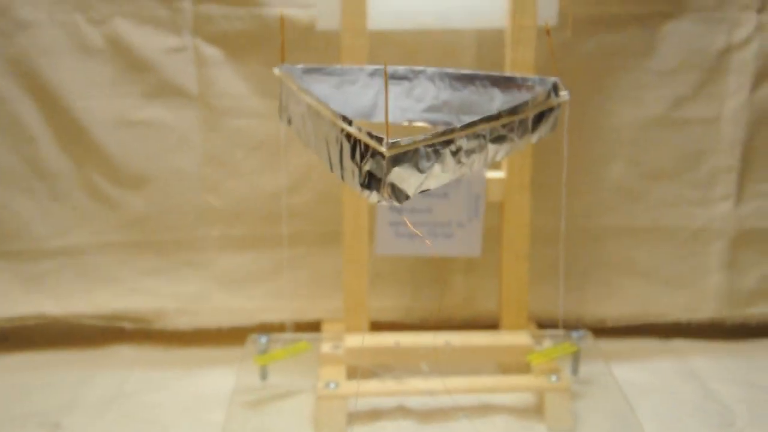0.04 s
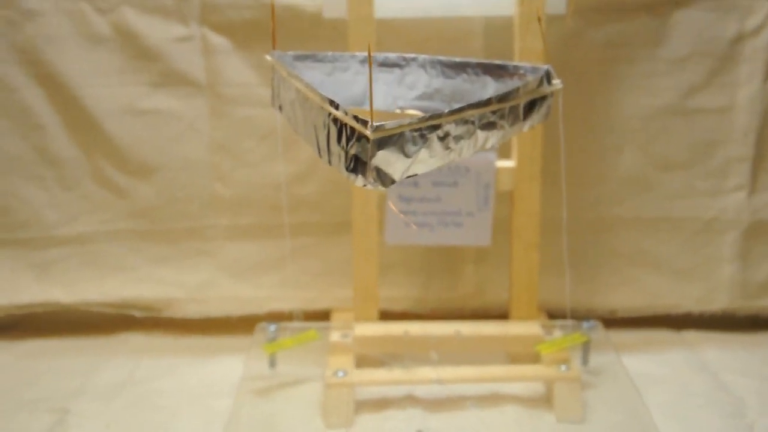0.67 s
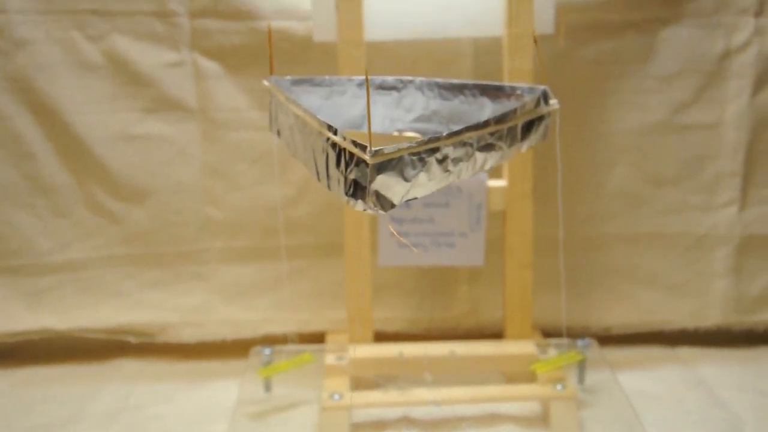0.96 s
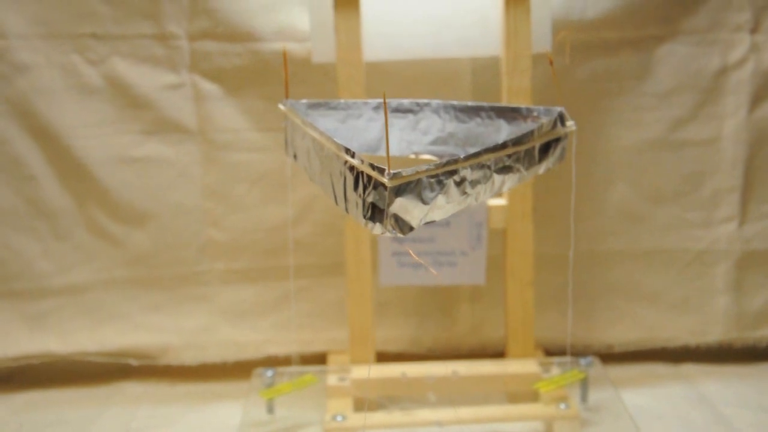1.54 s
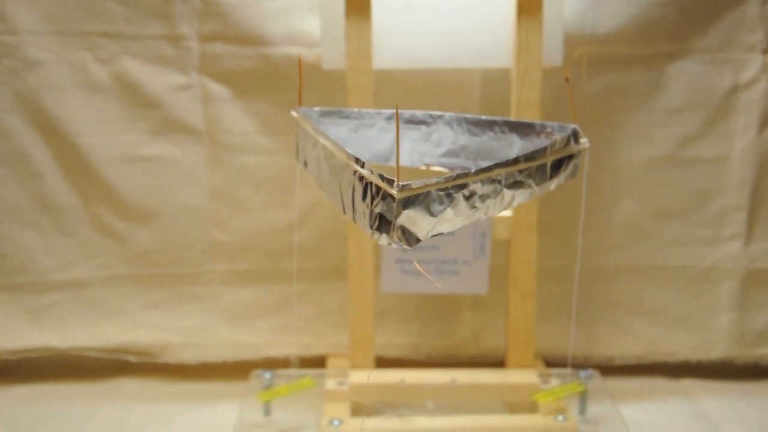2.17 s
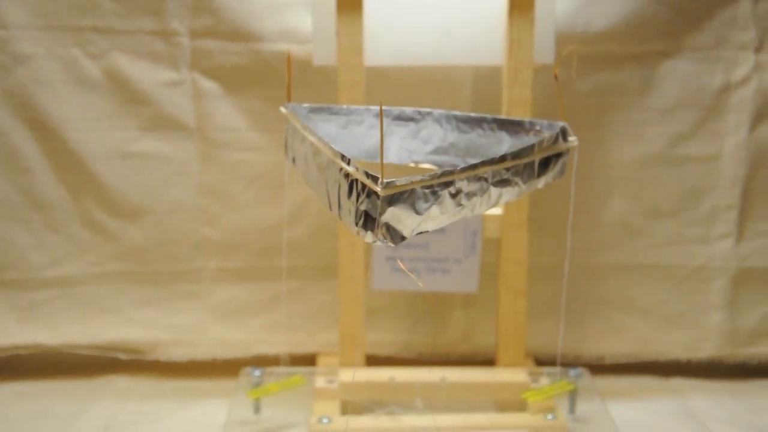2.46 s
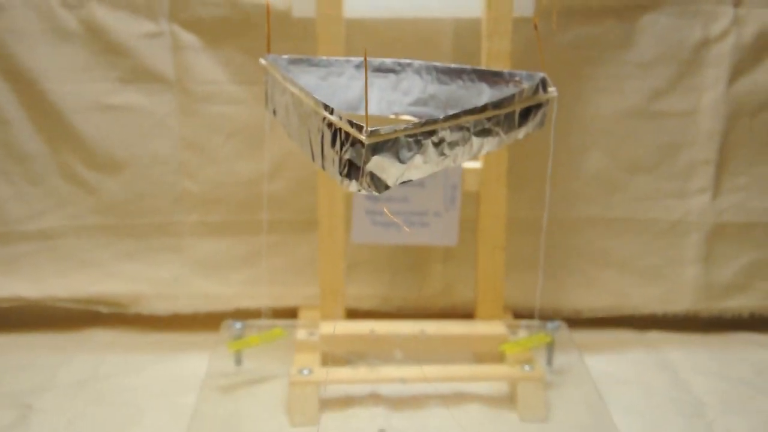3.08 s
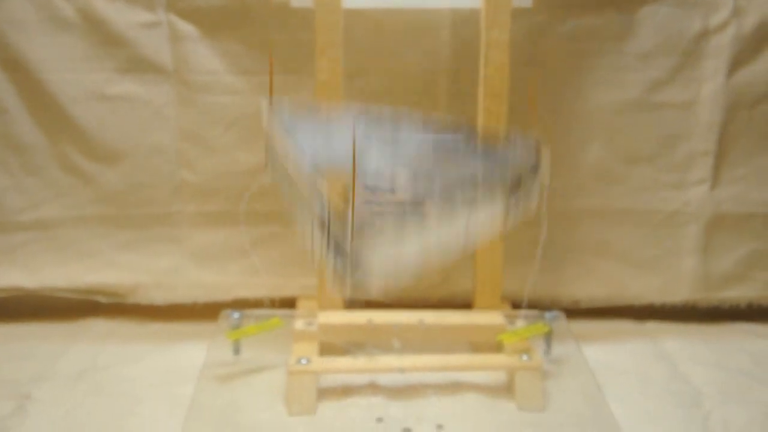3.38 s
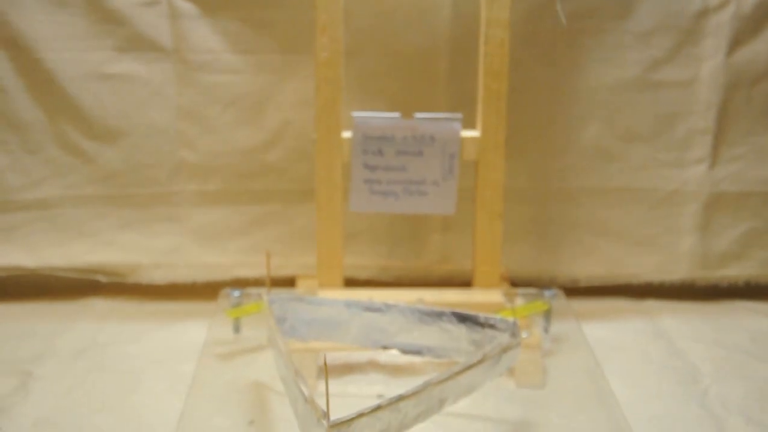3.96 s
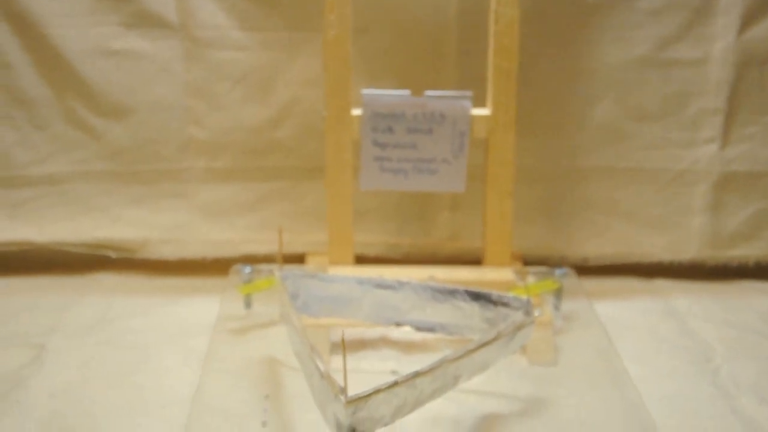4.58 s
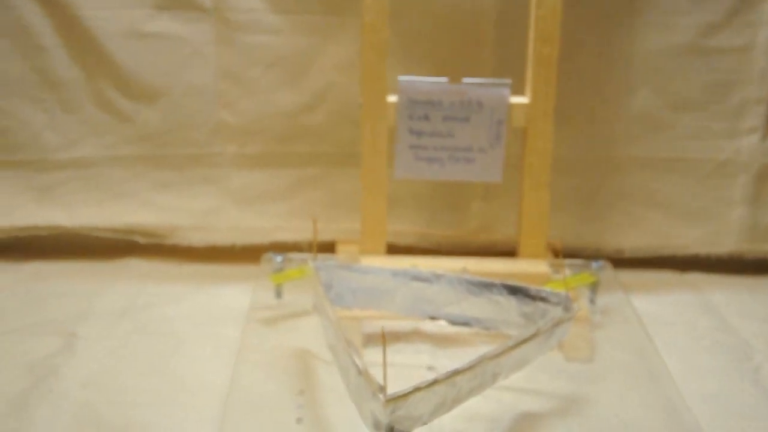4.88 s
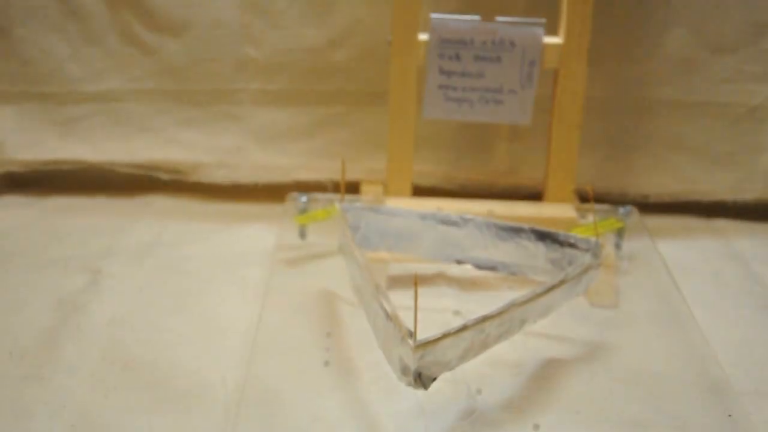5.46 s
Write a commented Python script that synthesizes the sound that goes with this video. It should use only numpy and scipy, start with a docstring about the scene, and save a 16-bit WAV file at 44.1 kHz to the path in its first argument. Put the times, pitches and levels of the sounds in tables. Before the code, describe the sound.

Steady electrical hissing stops suddenly, followed by sharp knocks and faint foil ticks as a light frame drops on a tabletop.

```python
"""In a small room, a foil and balsa ion lifter hovers over a table. Countless tiny corona discharges
on its wire, each a pressure pulse, merge into a hiss over a soft rush of air. The voltage is cut, the
charge drains and the hiss stops. The craft drops, bounces once and settles with faint ticks of foil;
its impacts excite the modes of frame and table. Room noise and a low wavering drone continue throughout,
with a dull knock at the start and a small click and a rustle near the end."""
import sys
import numpy as np
from scipy import signal
from scipy.fft import rfft, irfft, next_fast_len
from scipy.io import wavfile
from scipy.ndimage import uniform_filter1d, minimum_filter1d

SR = 44100
rng = np.random.default_rng(int(sys.argv[2]) if len(sys.argv) > 2 else 0)


def inscribe(sig):
    """Save sig as 16-bit PCM at rate SR to the path in sys.argv[1].

    A 1-D sig is mono; a 2-D sig holds one channel per row.
    Samples are clipped to [-1, 1] before scaling.
    """
    pcm = np.round(np.clip(np.atleast_2d(sig).T, -1, 1) * 32767)
    wavfile.write(sys.argv[1], SR, pcm.astype(np.int16))


N = 252693
T = np.arange(N) / SR
CUT_S = 3.348  # the voltage is switched off


def undb(db):
    """Amplitude ratio of a level in decibels."""
    return 10 ** (np.asarray(db) / 20)


def unit_rms(x):
    """Normalisation to rms 1."""
    return x / np.sqrt(np.mean(x ** 2))


def unit_energy(x):
    """Normalisation to energy 1."""
    return x / np.sqrt(np.sum(x ** 2))


def place(start_s, sound):
    """Pure delay: the sound begins at start_s."""
    return np.pad(sound, (int(start_s * SR), N))[:N]


def convolve(x, response):
    """Convolution with an impulse response, cut to the input's length."""
    return signal.fftconvolve(x, response)[:len(x)]


def butterworth(x, hz, kind, order=2):
    """Causal filter with a maximally flat passband."""
    return signal.sosfilt(signal.butter(order, hz, kind, fs=SR, output="sos"), x)


def colour(x, spectrum, tilt_db=0, size=4096):
    """Minimum-phase filter through (f/Hz, level/dB) points, tilted by tilt_db per octave about 3 kHz."""
    hz, db = np.transpose(spectrum)
    f = np.maximum(np.arange(size // 2 + 1) * SR / size, 10)
    octave = np.log2(f / 3000)
    gain = undb(np.interp(octave, np.log2(hz / 3000), db) + tilt_db * np.maximum(octave, -2))
    cepstrum = irfft(np.log(gain))
    cepstrum[1:size // 2] *= 2  # folding onto positive time makes the response causal
    cepstrum[size // 2 + 1:] = 0
    return convolve(x, irfft(np.exp(rfft(cepstrum))))


def resonant_noise(peaks):
    """Random excitation of resonances (f/Hz, width/Hz, level/dB), at rms 1."""
    size = next_fast_len(N, True)
    f = np.arange(1, size // 2 + 2) * SR / size
    power = sum(undb(db) ** 2 / (1 + ((f / hz - hz / f) * hz / (2 * width)) ** 2) ** 2
                for hz, width, db in peaks)
    white = rfft(rng.standard_normal(size))
    return unit_rms(irfft(white * np.sqrt(power), size)[:N])


def wander(rate_hz):
    """Random modulation: smoothed steps at rms 1."""
    span = int(SR / rate_hz)
    steps = np.repeat(rng.standard_normal(N // span + 1), span)
    return unit_rms(uniform_filter1d(uniform_filter1d(steps, span), span)[:N])


def decay(t60):
    """Half a second of exponential damping, 60 dB in t60 seconds."""
    return np.exp(-np.log(1000) * T[:SR // 2] / t60)


def ring(modes, detune=0.0042):
    """Free vibration: damped modes of alternating sign, slightly detuned at each strike."""
    pull = 1 + detune * rng.standard_normal(len(modes))
    partials = ((-1) ** k * undb(db) * decay(t60) * np.cos(2 * np.pi * hz * pull[k] * T[:SR // 2])
                for k, (hz, db, t60) in enumerate(modes))
    return unit_energy(sum(partials))


def burst(t60):
    """Exponentially damped noise of energy 1."""
    return unit_energy(decay(t60) * rng.standard_normal(SR // 2))


def room(x, wet_db, gap_s=.008, t60=0.53):
    """Reverberation: diffuse wall reflections follow the direct sound."""
    return x + undb(wet_db) * convolve(x, place(gap_s, burst(t60))[:SR])


def after_cut(db_per_s):
    """Relaxation: a gain of 1 that decays exponentially once the voltage is cut."""
    return undb(-db_per_s * np.maximum(T - CUT_S, 0))


# spectrum of one discharge: f/Hz, level/dB
DISCHARGE_SPECTRUM = [(120, -24.5), (280, -12.5), (750, -4), (1000, -6.5), (1300, -2), (1750, -3.5),
                      (2050, -8), (2650, -0.5), (3600, -1.5), (4300, 2.5), (5000, 1), (5500, -3.5),
                      (6050, -9), (6500, -15)]
# modes of the foil skirt: f/Hz, level/dB, T60/s
SKIRT_MODES = [(620, -3.5, 0.02), (825, 0, 0.0096), (1307, 0, .05), (2630, 0, 0.035), (4120, -4.5, 0.09),
               (4290, 1.5, 0.03), (4511, -4, 0.071), (4950, -2.5, 0.013)]


def corona(per_s=4000, spread_db=2.0, skirt_db=-11, db=-38.5, rise_db_per_s=0.46):
    """Shot noise: random discharges of uneven size add up to a hiss until the charge drains."""
    fires = rng.random(N) < per_s / SR
    pulses = fires * undb(spread_db * np.minimum(rng.exponential(size=N), 4))
    discharges = colour(pulses - pulses.mean(), DISCHARGE_SPECTRUM)
    # forced vibration: the ion wind streams over the foil and keeps it ringing
    foil = convolve(rng.standard_normal(N), ring(SKIRT_MODES, detune=.001))
    hiss = unit_rms(discharges) + undb(skirt_db) * unit_rms(foil)
    envelope = undb(db + rise_db_per_s * T) * after_cut(db_per_s=421)
    return room(hiss * envelope, wet_db=-13)


# resonances of the rushing air: f/Hz, width/Hz, level/dB
AIR_RESONANCES = [(228, 29, -1.5), (305, 90, -4.5), (516, 81, -5), (678, 110, 1), (869, 81, 3),
                  (1117, 63, 1), (1298, 99, 0.5), (1680, 790, -11)]


def air_rush(db=-46, gust_db=0.72):
    """Turbulence: moving air makes a soft rush that runs down slowly after the cut."""
    return resonant_noise(AIR_RESONANCES) * undb(db + gust_db * wander(27.26)) * after_cut(db_per_s=14)


def supply_hum(hz=329.6, db=-64, waver_db=2.5):
    """Amplitude modulation: the power supply's faint tone wavers, then fades after the cut."""
    envelope = undb(db + waver_db * wander(5.2)) * after_cut(db_per_s=40)
    return np.sqrt(2) * envelope * np.sin(2 * np.pi * hz * T)


# spectral density of the room noise: f/Hz, level/dB
ROOM_SPECTRUM = [(25, -8), (38, -13.5), (52, -0.5), (72, -3.5), (130, -1), (190, -6), (400, -2),
                 (850, -15.5), (1900, -12.5), (3200, -18), (5000, -22), (6400, -32)]
# its resonances: f/Hz, width/Hz, level/dB
ROOM_RESONANCES = [(568, 67, 2.5), (700, 44, -1), (1127, 93, -2), (1294, 80, -2.5), (2120, 60, 0),
                   (2605, 55, -4.5), (3664, 130, -10.5), (4060, 80, -14.5), (4480, 100, -11),
                   (4810, 60, -14), (5140, 60, -14), (5370, 70, -16), (5650, 110, -19)]


def room_noise(broad_db=-57, peaks_db=-58, flutter_db=0.6):
    """Superposition of broadband noise and hollow resonances, fluttering slightly in level."""
    broad = undb(broad_db) * unit_rms(colour(rng.standard_normal(N), ROOM_SPECTRUM))
    hollow = undb(peaks_db) * resonant_noise(ROOM_RESONANCES)
    return (broad + hollow) * undb(flutter_db * wander(16))


def wavering_tone(hz, db, pitch_spread, spread_db):
    """Random frequency and amplitude modulation of a sinusoid."""
    phase = 2 * np.pi * np.cumsum(hz * (1 + pitch_spread * wander(16))) / SR
    return np.sqrt(2) * undb(db + spread_db * wander(27)) * np.sin(phase)


# pitch contour of the low drone: t/s, f/Hz
DRONE_PITCH = [(0.0, 55.9), (1.66, 70.4), (2.46, 63.2), (2.66, 67.6), (4.02, 77.7), (5.55, 74.6),
               (5.73, 71.3)]


def low_drone(db=-67.5, swell_db_per_s=.5):
    """Frequency modulation: a distant tone glides along its contour and slowly swells."""
    hz = np.interp(T, *np.transpose(DRONE_PITCH))
    return wavering_tone(hz, db + swell_db_per_s * T, pitch_spread=.03, spread_db=4)


# spectrum of the knock: f/Hz, level/dB
KNOCK_SPECTRUM = [(50, -5), (140, -2), (450, 7), (700, 5.5), (1300, 0), (1900, -8), (4000, -22)]


def knock(start_s=0.011, db=-2, tail_db=1):
    """Impulse excitation: a pulse and its short tail sound dull because they have little treble."""
    push = undb(tail_db) * burst(t60=0.12)
    push[0] -= 1
    return place(start_s, undb(db) * colour(push, KNOCK_SPECTRUM))


def climbing_drone(start_s=2.3, end_s=3.6, fade_s=.12, from_hz=98, toward_hz=140, lag_s=1.5,
                   db=-68, swell_db_per_s=9):
    """Exponential approach: a swelling tone climbs ever more slowly, like a far engine gathering speed."""
    age = np.clip(T - start_s, 0, end_s - start_s)
    hz = toward_hz + (from_hz - toward_hz) * np.exp(-age / lag_s)
    gate = np.clip(np.minimum(age, end_s - T) / fade_s, 0, 1)
    return gate * wavering_tone(hz, db + swell_db_per_s * age, pitch_spread=.014, spread_db=1.5)


# clearest crinkles as the craft falls and settles: t/s, level/dB
CRINKLES = [(3.494, -17), (3.503, -24), (3.513, -19), (3.54, -15), (3.797, -30), (3.8826, -27),
            (3.9098, -27), (4.0485, -29), (4.1015, -29)]
# spectrum of a crinkle: f/Hz, level/dB
CRINKLE_SPECTRUM = [(2000, -22), (4400, 1), (5050, 8.5), (5500, 0), (6100, -1.5), (6600, -16.5)]


def foil_crinkles(settle_s=3.78, span_s=.4, faint_db=-30, scatter_db=1, faint_count=4):
    """Transient emission: the foil crinkles in crisp bursts, with faint random ones as it settles."""
    faint = [(settle_s + span_s * when, faint_db + scatter_db * (1 - 2 * softness))
             for when, softness in rng.random((faint_count, 2))]
    bursts = sum(place(s, undb(db) * burst(t60=0.063)) for s, db in CRINKLES + faint)
    return colour(bursts, CRINKLE_SPECTRUM)


# blows of the frame on the table:
# t/s, level/dB, tilt/(dB per octave), snap level/dB, loss per rebound/dB, bass cutoff/Hz
IMPACTS = [(3.541, -28.5, -8, -20, 0, 900), (3.5614, 3.5, 5, -6, 9.5, 700), (3.5700, 5, -0.5, -9.5, 7, 250),
           (3.5735, -1.5, 1.5, -11, 5, 400), (3.5920, -13.5, -1, -14, 1, 300),
           (3.6010, -7, -4.5, -9.5, 8.5, 400), (3.6716, -7.5, 1, -3.5, 5.5, 1200),
           (3.6735, -7, -1.5, -4.5, 9, 1500)]
# spectrum of the crack of wood and foil: f/Hz, level/dB
CRACK_SPECTRUM = [(60, -30.5), (180, -27.5), (400, 3.5), (950, -1), (1500, 10.5), (2100, 2.5), (3000, 9),
                  (4200, 8), (5400, 3), (6400, -10)]
# modes of frame and table: f/Hz, level/dB, T60/s
FRAME_MODES = [(349, -22.5, 0.43), (636, -17, 0.28), (785, -12.5, 0.45), (1320, -8, 0.37), (1540, -4, 0.17),
               (1560, -3, 0.06), (1710, -10, 0.25), (1760, -9, 0.15), (1910, -9, 0.38), (2310, -5, 0.25),
               (2630, -12, 0.14), (2780, -8, 0.2), (2950, -1, 0.16), (3220, -9, 0.12), (3570, -6, 0.09),
               (3680, 0.5, 0.1), (3840, 1.5, 0.096), (3990, -2, 0.095), (4335, 2, 0.1), (4540, -2.5, 0.099),
               (4950, -10, 0.18), (5275, -12.5, 0.14)]


def landing(rattle_db=3, tail_db=-7, modes_db=-3.5, boom_db=-0.5, boom_band_hz=(200, 480)):
    """Impact excitation: each contact snaps, rattles the foil skirt and rings frame and table."""
    slaps, boom = 0, 0
    for s, db, tilt_db, snap_db, cutoff_hz in rebounds(IMPACTS):
        # each corner lands at its own spot and so has its own diffuse tail
        contact = undb(rattle_db) * burst(t60=0.079) + undb(tail_db) * burst(t60=0.44)
        contact[0] += 2 * undb(snap_db)
        crack = colour(contact, CRACK_SPECTRUM, tilt_db)
        ringing = undb(modes_db) * ring(FRAME_MODES, detune=.002)
        slap = butterworth(crack + ringing, cutoff_hz, "highpass")  # a glancing touch has little bass
        slaps += place(s, undb(db) * slap)
        boom += place(s, undb(db + boom_db) * burst(t60=1.3))  # low notes linger longer in the room
    return slaps + butterworth(boom, boom_band_hz, "bandpass")


def rebounds(impacts, count=4, gap_s=.0034, scatter=.3):
    """Inelastic collision: each blow chatters in unevenly spaced contacts, each weaker than the last."""
    for s, db, tilt_db, snap_db, loss_db, cutoff_hz in impacts:
        slip = scatter * rng.uniform(-1, 1, count)
        slip[0] = 0
        for k in range(count):
            yield s + (k + slip[k]) * gap_s, db - k * loss_db, tilt_db, snap_db, cutoff_hz


# a light tap and its rebound: t/s, level/dB
TAPS = [(4.8891, -19.5), (4.8934, -25)]
# modes of the tapped object: f/Hz, level/dB, T60/s
TAP_MODES = [(726, 2, 0.017), (1290, 6.5, 0.0067), (1750, 3.5, 0.0073), (2700, -4, .007), (4300, -9, .006),
             (5500, -11, .005)]


def click():
    """Heavy damping: the modes of a small tapped object die within milliseconds."""
    return room(sum(place(s, undb(db) * ring(TAP_MODES)) for s, db in TAPS), wet_db=-19)


def rustle(centre_s=5.19, width_s=0.065, db=-59, grain_db=4):
    """Amplitude-modulated noise: a faint, grainy rustle under a brief Gaussian envelope."""
    grain = undb(db + grain_db * wander(70))
    envelope = np.exp(-.5 * ((T - centre_s) / width_s) ** 2)
    return resonant_noise([(1712, 840, 0), (2700, 540, -11)]) * grain * envelope


def scene():
    """Linear superposition of the lifter, its fall and the room around it, in one channel."""
    hover = corona() + air_rush() + supply_hum()
    fall = landing() + foil_crinkles()
    drones = low_drone() + climbing_drone()
    return (hover + fall + drones + room_noise() + click() + knock() + rustle())[None]


def record(dry, rolloff_hz=6200, ceiling=.8, limiter_s=.002, top_hz=7000):
    """Band and peak limiting: the treble rolls off, peaks are held down and a steep low-pass follows."""
    soft = butterworth(dry, rolloff_hz, "lowpass", order=16)
    span = int(limiter_s * SR)
    needed_gain = ceiling / np.maximum(np.abs(soft), ceiling)
    gain = uniform_filter1d(minimum_filter1d(needed_gain, span), span)
    return signal.sosfilt(signal.ellip(10, .2, 80, top_hz, fs=SR, output="sos"), gain * soft)


dry = scene()
out = record(dry)
inscribe(out)
```